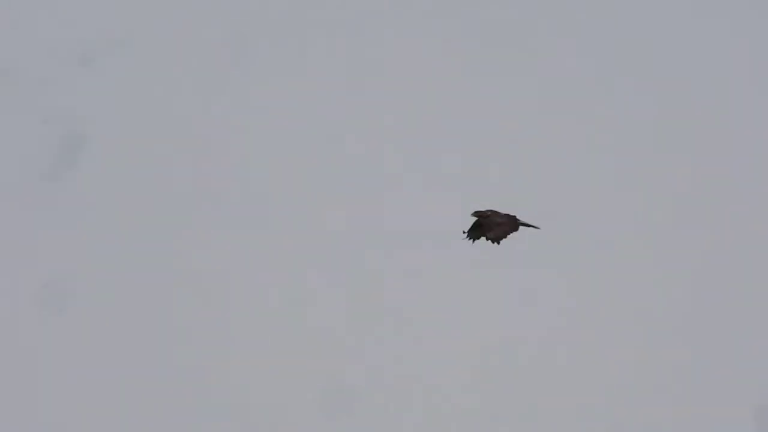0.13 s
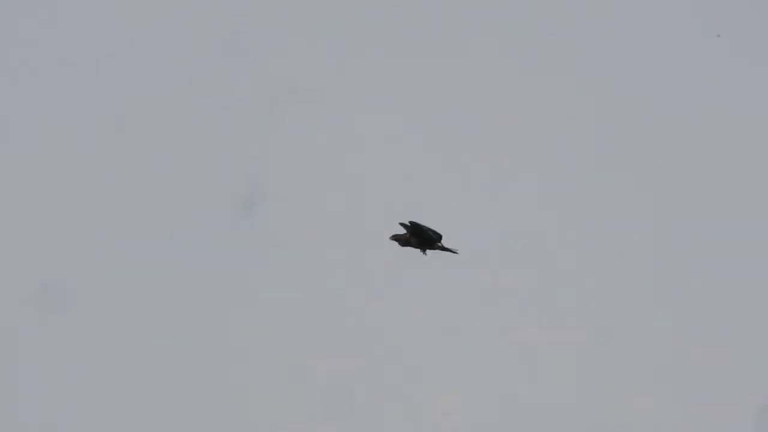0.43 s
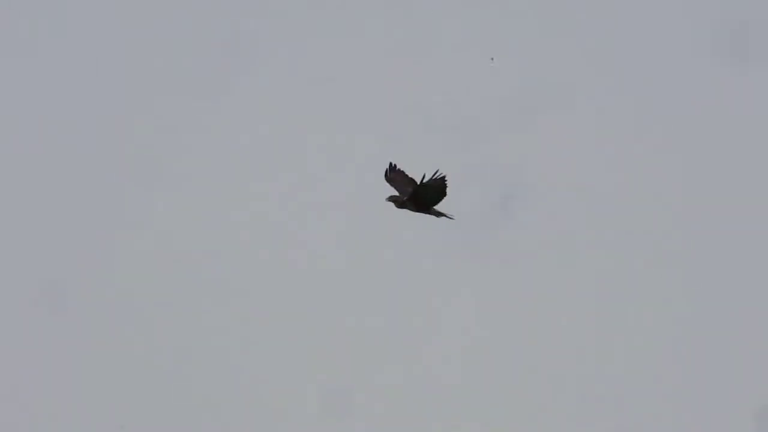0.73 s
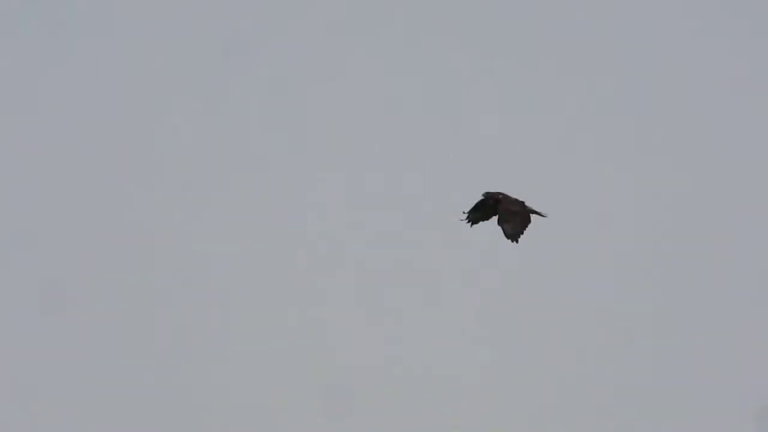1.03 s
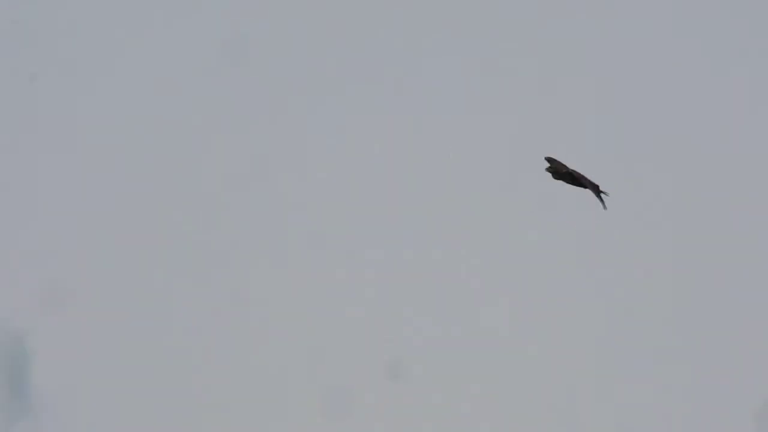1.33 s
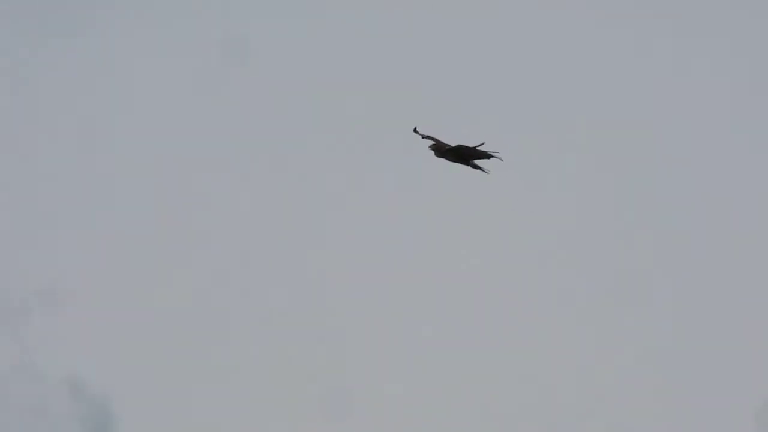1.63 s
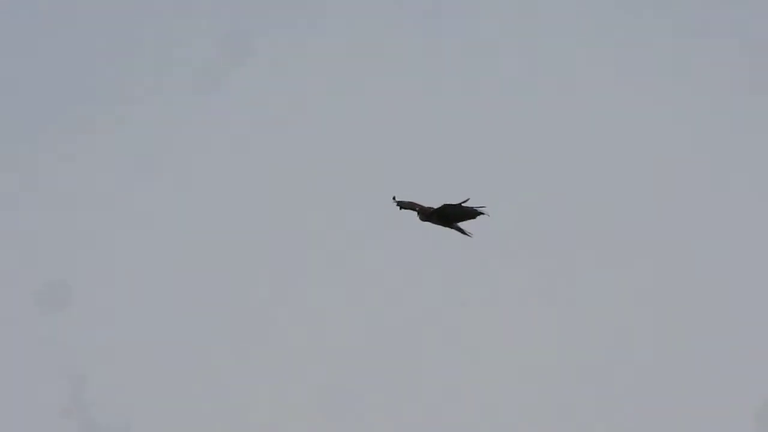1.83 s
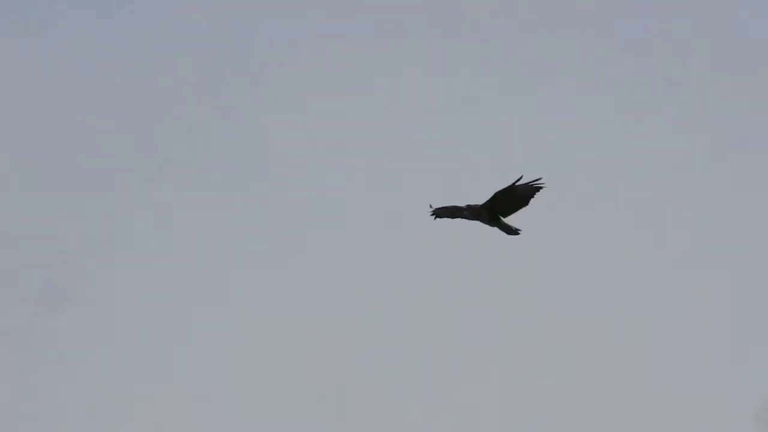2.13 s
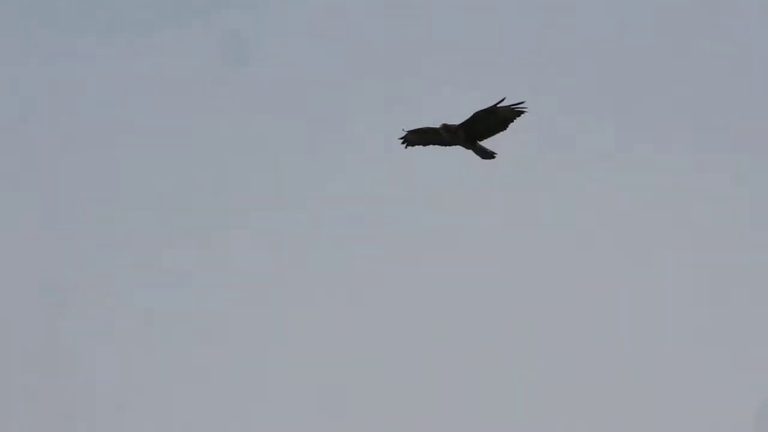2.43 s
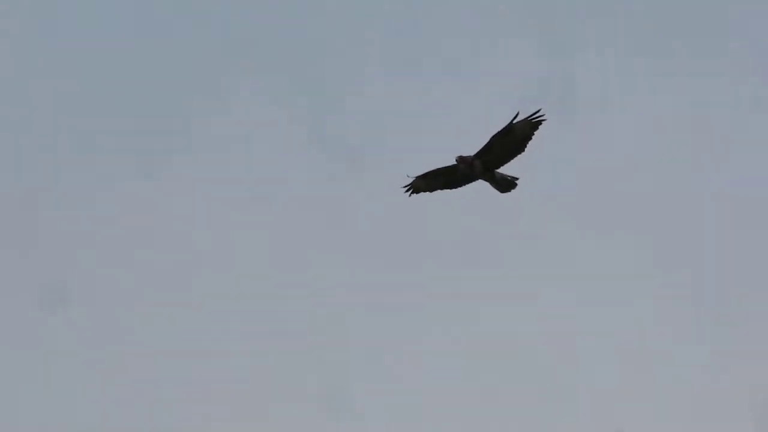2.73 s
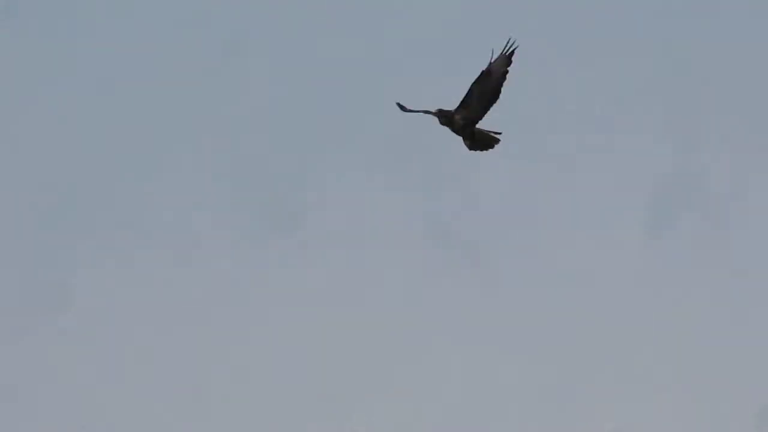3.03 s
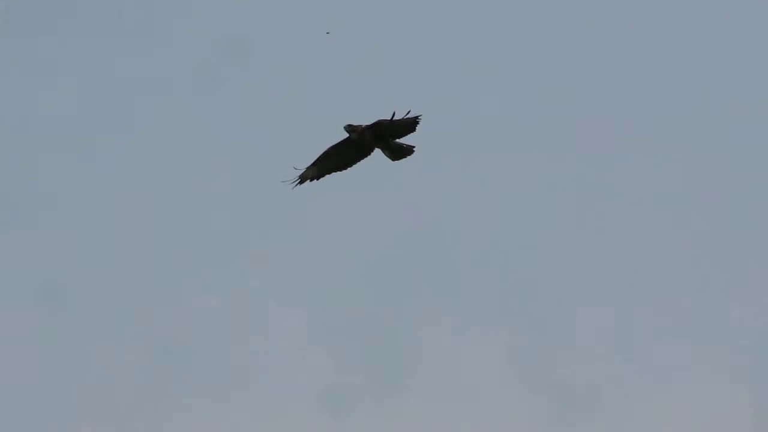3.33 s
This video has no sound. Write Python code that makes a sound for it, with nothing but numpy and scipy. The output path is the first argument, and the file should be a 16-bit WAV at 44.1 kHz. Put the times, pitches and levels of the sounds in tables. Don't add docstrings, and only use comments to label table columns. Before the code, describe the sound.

Single plaintive, slightly cracked buzzard mew above steady far traffic rumble and buffeting gusts

```python
import sys
import numpy as np
from scipy import signal
from scipy.fft import rfft, irfft, next_fast_len
from scipy.io import wavfile

SR = 44100
rng = np.random.default_rng(int(sys.argv[2]) if len(sys.argv) > 2 else 0)


def gain_from_decibels(decibels):
    exponent = np.asarray(decibels, float) / 20
    return 10 ** exponent


def master(y):
    cut = np.clip(np.atleast_2d(y).T, -1, 1)
    pcm = np.round(cut * 32767)
    wavfile.write(sys.argv[1], SR, pcm.astype(np.int16))


N = 153027

# time [s], level [dB], tilt [dB per octave].
TRAFFIC_SWELL = [(0, -3, 0.5), (.35, -1.15, 0.74), (.75, 0.2, 0.55), (1.3, 0.04, 0.4), (1.8, 0.5, -0.4),
                 (2.2, 0.8, -1.45), (2.7, -0.56, -1.87), (3.47, -2, -.5)]


def rms_one(x):
    return x / np.sqrt(np.mean(x ** 2) + 1e-20)


def in_time(rows):
    s, *columns = np.transpose(rows)
    return [np.interp(np.arange(N) / SR, s, column) for column in columns]


def at_hz(points, hz):
    p = np.array(points, float)
    return np.interp(np.log(hz + 1), np.log(p[:, 0] + 1), p[:, 1])


def drift(rate_hz):
    step = 40
    r = np.exp(-2 * np.pi * rate_hz * step / SR)
    draws = rng.standard_normal(N // step + 2002)
    slow = signal.lfilter([1], [1, -2 * r, r * r], draws)[2000:]
    return np.interp(np.arange(N) / step, np.arange(len(slow)), rms_one(slow - slow.mean()))


def noise(spectrum, band_db, extra_db=None, alike=None, lean_db=None):
    # frequency [Hz], correlation [0 to 1].
    likeness = [(40, 1), (110, 1), (400, 0.93), (1500, 0.99), (2400, 0.94), (3400, 0.92), (4500, .65),
                (6500, 1)]
    # frequency [Hz], left over right [dB].
    lean = [(60, 1), (240, 0), (930, 1), (1470, 1.5), (2100, -2), (2750, -5), (3450, -0.7), (4200, 5.5)]
    # frequency [Hz], left lead [rad].
    lead = [(260, -.1), (950, .3), (2070, .2), (2750, .8), (3450, 1.6), (4800, 1.65), (6500, 3),
            (8500, 5.6)]
    size = next_fast_len(N)
    hz = np.arange(size // 2 + 1) * SR / size
    colour_db = at_hz(spectrum, hz)
    if extra_db is not None:
        colour_db = colour_db + extra_db(hz)
    colour = gain_from_decibels(colour_db) * (hz > spectrum[0][0]) * (hz < spectrum[-1][0])

    mid, side = rfft(rng.standard_normal((2, size)), axis=1)
    c = np.clip(at_hz(likeness, hz) if alike is None else alike, 0, .999)
    common, own = np.sqrt(1 + c) * mid, np.sqrt(1 - c) * side
    pan_db = at_hz(lean, hz) if lean_db is None else lean_db
    turn = np.exp(.5j * at_hz(lead, hz)) * gain_from_decibels(.5 * pan_db)
    pair = np.array([(common + own) * turn, (common - own) / turn]) * colour
    pair = pair / np.sqrt(np.mean(irfft(pair.mean(axis=0), size) ** 2))

    half_octave, out = 2 * np.log2(hz + 1), 0
    for k in range(int(2 * np.log2(10)), int(2 * np.log2(SR / 2)) + 1):
        window = np.cos(np.pi / 2 * np.clip(half_octave - k, -1, 1)) ** 2
        if (window * colour).max() > 1e-9:
            gain = gain_from_decibels(band_db(2 ** (k / 2)))
            out = out + gain * irfft(pair * window, size, axis=1)[:, :N]
    return out


def traffic():
    # frequency [Hz], density [dB per Hz].
    rumble_colour = [(20, -31), (75, -10.5), (113, -1.5), (132, -3.5), (174, -16), (230, -13), (290, -22),
                     (480, -34.5)]
    # frequency [Hz], density [dB per Hz].
    roar_colour = [(250, -9), (400, -11.5), (626, -5), (1480, -3), (2660, -10.5), (3700, -22.5),
                   (5000, -42), (7000, -71)]
    # centre [Hz], width [Hz], rise [dB].
    humps = [(619, 130, 4), (1000, 230, 4), (1465, 270, 5.5), (1970, 240, 4), (2580, 180, 2),
             (3287, 540, 3), (3840, 110, -1.5)]
    roar_db, rumble_db = -32.5, -31.5
    heave_db_per_s = 1.73
    swell_db, tilt_db = in_time(TRAFFIC_SWELL)

    def humps_db(hz):
        return sum(db * np.exp(-(2 * (hz - f) / w) ** 2) for f, w, db in humps)

    def roar_band_db(hz):
        return swell_db + tilt_db * np.log2(hz / 1000) + 0.51 * drift(3.5)

    heave_db = heave_db_per_s * (np.arange(N) / SR - 1.4)
    roar = noise(roar_colour, roar_band_db, humps_db)
    rumble = noise(rumble_colour, lambda hz: heave_db + 2.6 * drift(8.9))
    return gain_from_decibels(roar_db) * roar + gain_from_decibels(rumble_db) * rumble


def motor():
    # frequency [Hz], level [dB rms].
    lines = [
        (322.1, -53.5),
        (644.0, -50.5),
        (966.2, -59.5),
    ]
    t = np.arange(N) / SR
    hum = 0
    for hz, db in lines:
        gain = np.sqrt(2) * gain_from_decibels(db + 2.5 * drift(0.67))
        hum = hum + gain * np.sin(2 * np.pi * hz * t + 0.14 * drift(4.2))
    return hum


def soft_hiss():
    # frequency [Hz], density [dB per Hz].
    hiss_colour = [(2500, 6), (4500, 0.5), (6500, -4), (8500, -5.5), (11000, -10), (15800, -17)]
    hiss_db, follow = -61, 0.48
    swell_db, tilt_db = in_time(TRAFFIC_SWELL)
    shared_db = follow * (swell_db + tilt_db) + 0.66 * drift(3.0)
    hiss = noise(hiss_colour, lambda hz: shared_db + 0.49 * drift(4.4), alike=.2, lean_db=1.3)
    return gain_from_decibels(hiss_db) * hiss


def wind():
    # time [s], level [dB], left over right [dB], tilt [dB per octave].
    gusts = [(0, -29.5, 6.5, 6), (.068, -24.5, 3, 5), (.17, -29.5, 6, 2.5), (.33, -29.5, 5, 0.5),
             (.43, -30, 0.5, -1.8), (.52, -36, -2, -3), (.97, -31.5, -3, -5), (1.1, -51, -4, -7),
             (1.5, -53, 1, -4), (1.8, -41.5, -2, -6), (2.15, -58.5, -6, -13), (2.5, -41.5, -1, -3),
             (2.62, -33, -1.5, -4), (2.9, -25.5, -0.5, -2.5), (3.15, -29.5, -4, -4.5),
             (3.27, -38, -17, -3.5), (3.37, -20, 4.5, 0.5), (3.47, -24.5, 0.5, -1.5)]
    # frequency [Hz], density [dB per Hz].
    wind_colour = [(15, -16.5), (35, -0.5), (70, -1), (130, -3), (200, -11.5), (350, -28.5), (600, -39),
                   (1500, -62)]
    # centre [s], half width [s], rise [dB].
    puffs = [
        (0.26, 0.011, 5),
        (.365, 0.016, 11.5),
        (.98, .015, -1),
        (1.99, 0.013, 8),
        (2.24, 0.043, 19.5),
        (2.959, 0.017, 5.5),
    ]
    brighten_db_per_octave_per_db, lumps_db = 0.082, 2
    t = np.arange(N) / SR
    gust_db, pan_db, tilt_db = in_time(gusts)
    gust_db = gust_db + sum(db * np.exp(-((t - s) / w) ** 2) for s, w, db in puffs)
    tilt_db = tilt_db + brighten_db_per_octave_per_db * (gust_db + 30)
    lumps = drift(14)

    def band_db(hz):
        return tilt_db * np.log2(hz / 70) + lumps_db * (lumps + 0.13 * drift(6.7))

    blow = noise(wind_colour, band_db, alike=.05, lean_db=2)
    return blow * gain_from_decibels(gust_db + pan_db * np.array([[.5], [-.5]]))


def housing(voice):
    # frequency [Hz], left over right [dB], left lead [rad].
    shade = np.array([(2100, -2, -.05), (2800, -3, .35), (3500, -.3, .5), (4300, 4.2, .3), (4800, 4.3, -.1),
                      (5700, 2, -.6), (7200, -1.3, -.15)])
    hz = np.arange(N // 2 + 1) * SR / N
    turn = gain_from_decibels(.5 * at_hz(shade[:, :2], hz)) * np.exp(.5j * at_hz(shade[:, ::2], hz))
    return irfft(rfft(voice) * np.array([turn, 1 / turn]), N, axis=1)


def buzzard():
    # time [s], pitch [Hz].
    rise = [(2.016, 1092), (2.022, 1146), (2.052, 1252), (2.058, 1309), (2.064, 1461)]
    # time [s], pitch [Hz].
    slide = [(2.07, 1440), (2.087, 1418), (2.092, 1462), (2.135, 1362), (2.166, 1290), (2.19, 1268),
             (2.206, 1188), (2.262, 1145), (2.305, 1070)]
    # time [s], level [dB], tilt [dB per harmonic].
    effort = [(2.019, -48, -7), (2.031, -33, -6), (2.052, -31.5, -16), (2.068, -35.5, -7.5), (2.1, -36, -7),
              (2.15, -37.5, -10.5), (2.205, -35.5, -12), (2.29, -39, -6.5), (2.375, -41.5, -7.5)]
    # frequency [Hz], gain [dB].
    throat = [(1000, -14.5), (2200, 0), (3500, -2.5), (4300, -2.5), (4800, 0), (5350, 2), (6400, -7),
              (7300, -2.5)]
    order_db = [0, 0, .5, -3, 1.5, -4, -2, -2]
    end_hz, release_s, release_db, release_drop_hz = 1043, .026, -12, 45
    crack_s, crack_width_s, crack_depth, crack_hz = 2.156, .023, .36, 600
    flutter_hz, flutter_peak_s, flutter_swing = 156, 2.1518, .065
    hoarse_from_s, hoarse_to_s, hoarse_swing, hoarse_hz = 2.02, 2.205, .011, 220
    jitter, shimmer_db, throat_fall_db_per_khz = .003, 1.9, 2
    echo_s, echo_db = .012, -18

    t = np.arange(N) / SR
    end_s, end_db, end_tilt_db = effort[-1]
    stop_s = end_s + release_s
    tail = [(end_s, end_hz), (stop_s, end_hz - release_drop_hz)]
    pitch_hz, = in_time(list(rise) + list(slide) + tail)
    effort_db, tilt_db = in_time(list(effort) + [(stop_s, end_db + release_db, end_tilt_db)])
    on = (t > effort[0][0]) & (t < stop_s)

    crack = np.exp(-((t - crack_s) / crack_width_s) ** 4)
    flutter = signal.sawtooth(2 * np.pi * flutter_hz * (t - flutter_peak_s) - 1.5, .76)
    hoarse = hoarse_swing * ((t > hoarse_from_s) & (t < hoarse_to_s)) * drift(hoarse_hz)
    wobble = 1 + jitter * drift(72) + hoarse + flutter_swing * crack * flutter
    phase = 2 * np.pi * np.cumsum(pitch_hz * wobble) / SR

    lowpass = signal.butter(2, crack_hz, fs=SR, output="sos")
    shake = rms_one(signal.sosfilt(lowpass, rng.standard_normal((2, N))))
    depth = crack_depth * crack
    rough_phase = phase + .3 * depth * shake[0]
    rough_gain = 1 - depth + depth * np.abs(shake[1])
    tilt_db = tilt_db + crack * (2.5 + 1.6 * flutter)

    voice = 0
    for k in range(1, 9):
        above_khz = np.maximum(k * pitch_hz - throat[-1][0], 0) / 1000
        throat_db = at_hz(throat, k * pitch_hz) - throat_fall_db_per_khz * above_khz
        source_db = effort_db + order_db[k - 1] + tilt_db * max(k - 2, 0)
        gain = gain_from_decibels(source_db + throat_db + shimmer_db * drift(37))
        voice = voice + gain * np.sqrt(2) * np.sin(k * rough_phase) * rough_gain

    rasp_band = signal.butter(2, [5500, 9600], "band", fs=SR, output="sos")
    rasp = rms_one(signal.sosfilt(rasp_band, rng.standard_normal(N)))
    voice = on * voice + gain_from_decibels(-66 + 4 * flutter) * crack * rasp
    voice = voice + gain_from_decibels(echo_db) * np.interp(t - echo_s, t, voice)
    return housing(voice)


def scene():
    return traffic() + motor() + soft_hiss() + wind() + buzzard()


def roll_off(x):
    return signal.sosfilt(signal.butter(12, 15730, fs=SR, output="sos"), x)


def record(dry):
    return roll_off(dry)


dry = scene()
out = record(dry)
master(out)
```